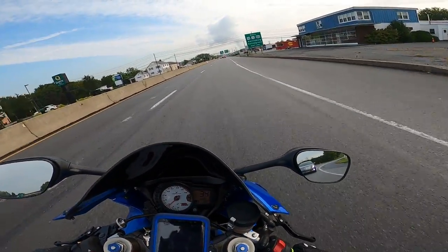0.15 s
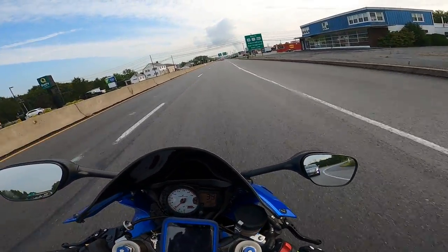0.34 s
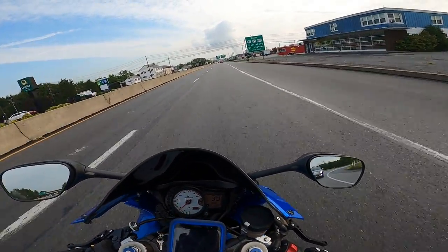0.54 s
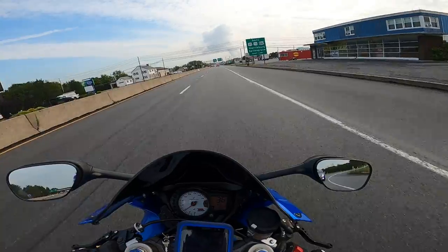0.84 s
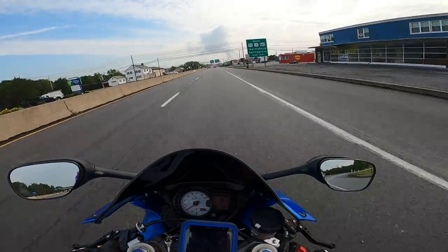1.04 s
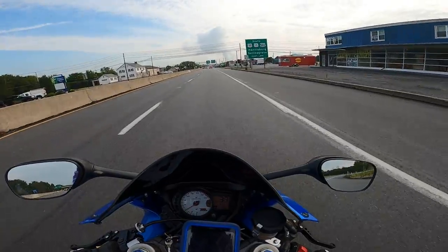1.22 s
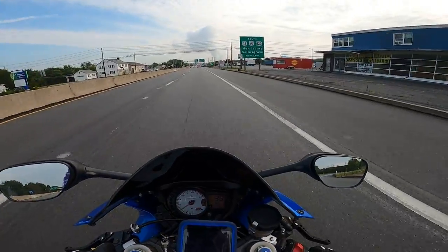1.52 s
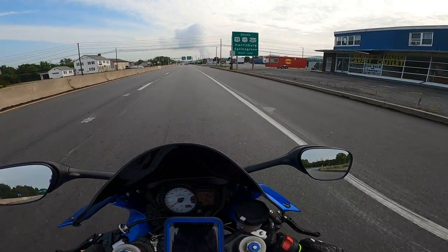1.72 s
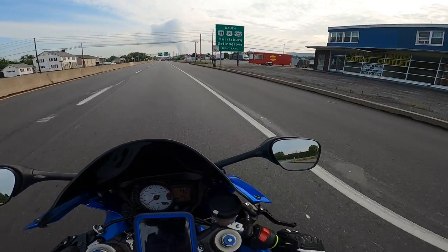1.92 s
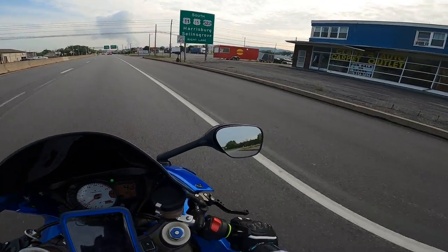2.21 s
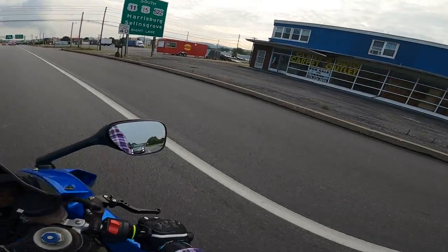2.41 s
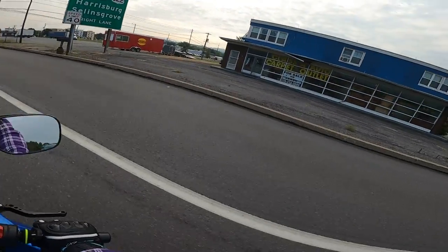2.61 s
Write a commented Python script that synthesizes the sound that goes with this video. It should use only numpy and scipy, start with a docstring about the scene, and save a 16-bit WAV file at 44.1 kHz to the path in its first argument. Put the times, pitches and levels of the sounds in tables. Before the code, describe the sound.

A four-cylinder sport motorcycle engine pulls steadily upward in pitch under low buffeting wind.

```python
"""A four-cylinder sport motorcycle pulls steadily up through one gear, heard from the rider's helmet, 2.75 s.
From the start: sines at crank orders drone through the exhaust, gated noise rasps, fuzzy gear tones flicker. By
0.9 s a once-a-cycle bark of sharper orders has opened up; a faint gear whine peaks, then fades. Wind, as
coloured noise, eases near 1 s and swells by 2 s; sines that swell and fade under Gaussian envelopes knock the
microphone around 1.85 and 2.36 s. The firing tone dips briefly at 2.15 s; a thin noise hiss grows throughout."""
import sys
import numpy as np
from scipy import signal
from scipy.fft import rfft, irfft, next_fast_len
from scipy.io import wavfile
from scipy.ndimage import uniform_filter1d, map_coordinates

SR = 44100
rng = np.random.default_rng(int(sys.argv[2]) if len(sys.argv) > 2 else 0)


def output_pcm(signal):
    """Save a mono or channel-first signal as 16-bit PCM at the path in sys.argv[1].

    Samples are clipped to [-1, 1] before scaling.
    """
    pcm = np.clip(np.atleast_2d(signal).T, -1, 1) * 32767
    wavfile.write(sys.argv[1], SR, np.round(pcm).astype(np.int16))


N = 121275
TIME_S = np.arange(N) / SR

# Engine pull. Each row: time in seconds, crank speed in Hz, then drone, firing, lope and bark gains in dB.
ENGINE_PULL = [(0, 114.1, -2.5, -2, -8, -14), (.25, 115.7, 0.5, -2, -5, -10),
               (.5, 119.1, 1, -2.5, -5.5, -12), (.7, 121.7, 0.5, -1.5, -5.5, -11.5),
               (.9, 124.8, 0, -2, -5.5, -2), (1.1, 128.8, 0.5, -2, -6.5, -1), (1.3, 131.4, 0, 0, -6, -0.5),
               (1.5, 134.9, 1, -2.5, -1, -3), (1.7, 138.2, 0, -1, 1, -2), (1.9, 141.5, 0, -2.5, 0, -2.5),
               (2.05, 143.8, -1, -2, 0.5, -2), (2.15, 145.6, 0, -15, 7.5, -2),
               (2.25, 147, -1.5, -7, -5.5, -3.5), (2.4, 149.4, 0.5, 2, 0.5, -1.5),
               (2.55, 151.5, -1, -1, 3, -2.5), (2.75, 154.7, 0, -4.5, 4.5, -3)]
# Order tables. Each row: multiple of crank speed, level in dB before the pipe and any gain over time.
DRONE_ORDERS = [(1, -13.5), (2.5, -21), (3, -19)]  # one suction dip a turn
FIRING_ORDERS = [(2, -16)]  # two firings a turn
LOPE_ORDERS = [(.5, -25), (1.5, -34.5)]  # uneven cylinders
BARK_ORDERS = [(3.5, -30), (5.5, -32.5), (6, -33.5), (6.5, -31.5), (7, -34)]  # sharp pulse once a cycle
RING_ORDERS = [(4, -23.5), (4.5, -34), (5, -32.5), (8, -40.5)]  # steady ring of the pipe
SNARL_ORDERS = [(7.5, -34.5), (8.5, -42.5), (9, -40.5), (9.5, -51.5), (10, -45.5), (11, -50.5), (12, -50),
                (13, -45.5)]  # snarl above the bark, smeared over the cycle by the pipe
# Exhaust response. Each row: frequency in Hz, gain in dB.
PIPE_RESPONSE = [(50, -7.5), (150, 0.84), (245, 2), (285, -5), (325, -21.5), (400, -11), (460, -4.76),
                 (505, 4), (545, -9), (590, -10.5), (700, -0.8), (800, -4.5), (910, -0.5), (975, -5),
                 (1040, -3.5), (1130, -5.5), (1230, 0.2), (1350, -8), (1600, -22.5), (2200, -15)]
# Gas noise spectrum. Each row: frequency in Hz, relative density in dB per Hz.
RASP_SPECTRUM = [(200, -28), (330, -15), (500, -1.8), (700, -11), (800, -7.5), (1000, -2.5), (1200, -4.5),
                 (1400, -13), (1550, -12), (1750, -17), (1980, -19), (2300, -27.5), (2650, -25.5),
                 (3100, -32.5), (4000, -45)]
# Gear and chain tones. Each row: multiple of crank speed, level in dB before flicker and thinning, width in Hz.
MESH_TONES = [(7.75, -51.5, 8), (9.25, -50.5, 16), (14.5, -63, 17), (15.75, -63.5, 22), (17, -62.5, 35),
              (19.5, -61.5, 16)]
# Gear whine. Each row: time in seconds, level in dB.
WHINE_LEVEL = [(0, -72), (.7, -70), (.9, -62.5), (1.2, -63.5), (1.5, -68), (1.9, -78.5), (2.75, -75)]
# Wind rumble. Each row: time in seconds, level in dB before the windscreen.
WIND_LEVEL = [(0, -19.5), (1, -24), (2, -18), (2.75, -17.5)]
# Wind spectra. Each row: frequency in Hz, relative density in dB per Hz.
RUMBLE_SPECTRUM = [(6, -2), (14, 2.5), (25, 1), (50, 4), (90, -2.5), (150, -7), (250, -11), (400, -19),
                   (700, -24), (1200, -45.5)]
HISS_SPECTRUM = [(1200, -17.5), (2500, -4.5), (4000, -3.5), (6000, -7.5), (8800, -8.5), (9600, -16)]
# Gusts that knock the microphone. Each row: centre in seconds, pitch in Hz, envelope peak in dB,
# half length in seconds.
GUST_THUDS = [(1.848, 16, -15, .05), (2.362, 125, -14.5, .018)]

START_TURNS, BARK_LAG_TURNS = 0.3, 0.5  # crank angle at the start; bark lag behind the dip
WAVER_DB, WAVER_RAD, WAVER_KNOTS_PER_S = 0.2, 0.04, 7.7  # dB and rad scale with the order
RASP_START_DB, RASP_DB_PER_S = -36.5, 1.3
RASP_TURN_GATE, RASP_CYCLE_GATE = 0.17, 0.042  # pulsing depths, once a turn and once a cycle
THIN_DB_PER_S = -2.5  # snarl and gear tones thin out as the revs climb
MESH_FLICKER_DB = 3.5
WHINE_ORDER, WHINE_WIDTH_HZ = 38.6, 150
RUMBLE_TOP = 0.34  # amplitude ceiling, full scale 1
HISS_START_DB, HISS_DB_PER_S = -56.5, 1.5  # grows with road speed
TOP_HZ = 9800


def engine():
    """Every layer follows one crank angle, the running sum of crank speed."""
    crank_hz, drone_db, firing_db, lope_db, bark_db = curves(ENGINE_PULL)
    angle = 2 * np.pi * (np.cumsum(crank_hz) / SR + START_TURNS)
    late = angle - 2 * np.pi * BARK_LAG_TURNS
    thin = amp(THIN_DB_PER_S * TIME_S)
    dips = exhaust_drone(crank_hz, angle, drone_db, firing_db, lope_db)
    pulses = exhaust_bark(crank_hz, late, bark_db, thin)
    return pulses - dips + gas_rasp(late) + thin * gear_mesh(angle) + gear_whine(angle)


def exhaust_drone(crank_hz, angle, drone_db, firing_db, lope_db):
    """Low crank orders: suction dip, firing tone and the lope of uneven cylinders."""
    drone = amp(drone_db) * orders(DRONE_ORDERS, crank_hz, angle)
    firing = amp(firing_db) * orders(FIRING_ORDERS, crank_hz, angle)
    lope = amp(lope_db) * orders(LOPE_ORDERS, crank_hz, angle)
    return drone + firing + lope


def exhaust_bark(crank_hz, late, bark_db, thin):
    """Higher orders half a turn late: steady ring, bark opening under load, snarl."""
    ring = orders(RING_ORDERS, crank_hz, late, smear=0.34)
    bark = amp(bark_db) * orders(BARK_ORDERS, crank_hz, late, smear=0.3)
    snarl = thin * orders(SNARL_ORDERS, crank_hz, late, smear=0.95)
    return ring + bark + snarl


def gas_rasp(late):
    """Rough gas noise in the pipe, partly pulsed by the engine."""
    gate = 1 + RASP_TURN_GATE * np.cos(late) + RASP_CYCLE_GATE * np.cos(late / 2)
    level_db = RASP_START_DB + RASP_DB_PER_S * TIME_S + 0.31 * wobble(3)
    return amp(level_db) * unit(gate * rush(RASP_SPECTRUM, patchy_db=1.5))


def gear_mesh(angle):
    """Faint fuzzy gear and chain tones, locked to the crank, that come and go."""
    mesh = 0
    for order, db, width_hz in MESH_TONES:
        level_db = db + MESH_FLICKER_DB * wobble(3.3)
        mesh = mesh + amp(level_db) * fuzzy(order * angle, width_hz)
    return mesh


def gear_whine(angle):
    """A faint high gear tone, a noise band riding on the crank."""
    return amp(curves(WHINE_LEVEL)[0]) * fuzzy(WHINE_ORDER * angle, WHINE_WIDTH_HZ)


def wind_rumble():
    """Low wind noise; the windscreen flattens the strongest pushes."""
    uneven = unit(amp(1.6 * wobble(3)) * rush(RUMBLE_SPECTRUM, patchy_db=0.7))
    push = amp(curves(WIND_LEVEL)[0]) * uneven
    return RUMBLE_TOP * np.tanh(push / RUMBLE_TOP)


def gust_thuds():
    """Gusts knock the microphone: sines under Gaussian envelopes."""
    thuds = np.zeros(N)
    for centre_s, hz, db, half_s in GUST_THUDS:
        t = TIME_S - centre_s
        thuds += amp(db) * np.exp(-(t / half_s) ** 2) * np.sin(2 * np.pi * hz * t)
    return thuds


def wind_hiss():
    """Thin unsteady air noise, growing with speed."""
    level_db = HISS_START_DB + HISS_DB_PER_S * TIME_S + 0.4 * wobble(5) + 1.4 * wobble(25)
    return amp(level_db) * rush(HISS_SPECTRUM, patchy_db=1.75)


def orders(table, crank_hz, angle, smear=0):
    """Slightly unsteady sines at multiples of crank speed, each through the pipe."""
    total = 0
    for k, db in table:
        level_db = db + along(PIPE_RESPONSE, k * crank_hz) + WAVER_DB * k * wobble(WAVER_KNOTS_PER_S)
        offset = smear * rng.uniform(-np.pi, np.pi)  # fixed random phase per order
        phase = k * angle + WAVER_RAD * k * wobble(WAVER_KNOTS_PER_S) + offset
        total = total + np.sqrt(2) * amp(level_db) * np.cos(phase)
    return total


def fuzzy(angle, width_hz):
    """A narrow band of noise, rms 1, that rides on a turning angle."""
    a, b = filtered(rng.standard_normal((2, N)), lambda hz: 1 / (1 + (hz / width_hz) ** 2))
    return unit(a * np.cos(angle) + b * np.sin(angle))


def rush(spectrum, patchy_db):
    """Coloured noise of rms 1 with time-frequency patches of random gain."""
    z = signal.stft(rng.standard_normal(N), nperseg=512)[2]
    field = uniform_filter1d(rng.standard_normal(z.shape), 6, 0)
    field = uniform_filter1d(field, 12, 1)
    patchy = signal.istft(z * amp(patchy_db * unit(field)), nperseg=512)[1][:N]
    cut_hz = spectrum[-1][0] * 2
    return unit(filtered(patchy, lambda hz: amp(along(spectrum, hz)) * (hz < cut_hz)))


def filtered(x, response):
    """x through a zero-phase response of frequency in Hz."""
    m = next_fast_len(N + SR // 2)
    return irfft(rfft(x, m) * response(np.fft.rfftfreq(m, 1 / SR)), m)[..., :N]


def wobble(knots_per_s):
    """A smooth random curve through normal knots."""
    return map_coordinates(rng.standard_normal(200), [TIME_S * knots_per_s])


def curves(rows):
    """One value per sample for each column after the time."""
    s, *columns = np.transpose(rows)
    return [np.interp(TIME_S, s, column) for column in columns]


def along(points, hz):
    """(Hz, value) points interpolated on a log axis."""
    f, v = np.transpose(points)
    return np.interp(np.log(hz + 1), np.log(f + 1), v)


def amp(db):
    """dB to amplitude."""
    return 10 ** (np.asarray(db) / 20)


def unit(x):
    """Scale to rms 1."""
    return x / np.sqrt(np.mean(x ** 2) + 1e-20)


def scene():
    """Engine over wind, one channel."""
    return (engine() + wind_rumble() + gust_thuds() + wind_hiss())[None]


def record(dry):
    """The camera keeps nothing above its band limit."""
    return filtered(dry, lambda hz: hz < TOP_HZ)


dry = scene()
out = record(dry)
output_pcm(out)
```